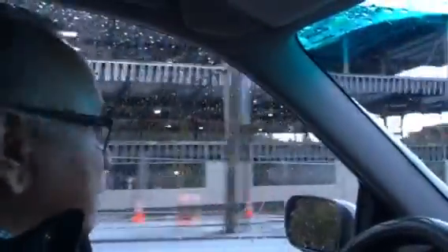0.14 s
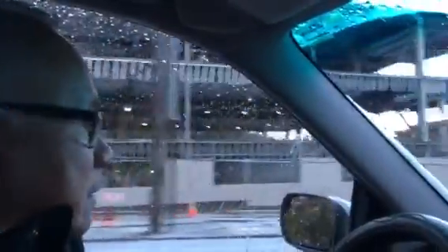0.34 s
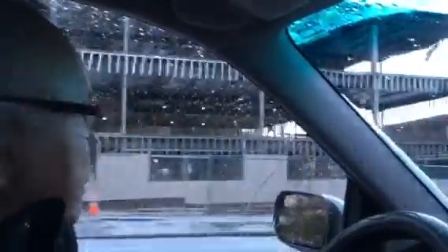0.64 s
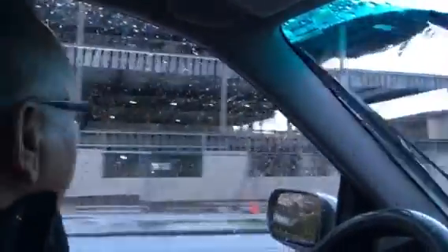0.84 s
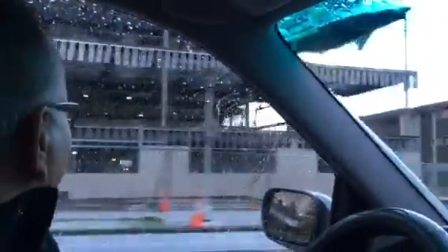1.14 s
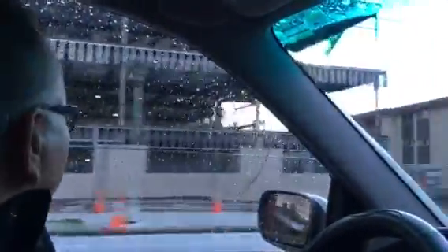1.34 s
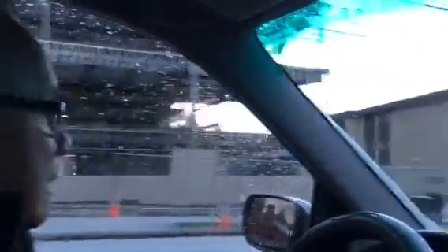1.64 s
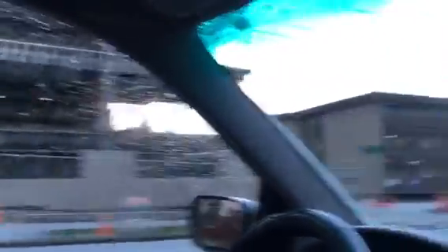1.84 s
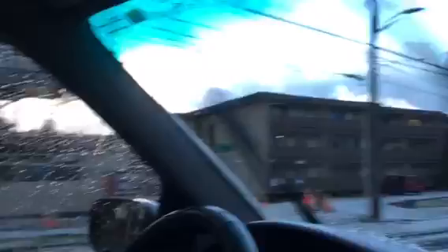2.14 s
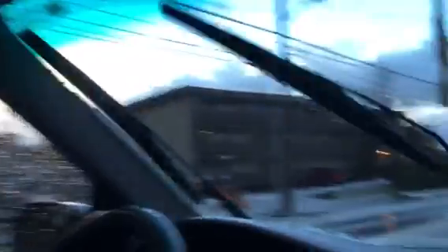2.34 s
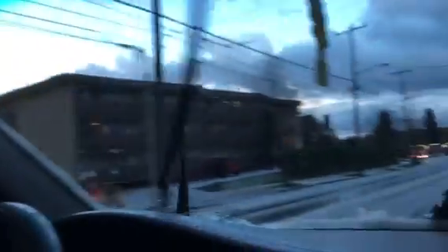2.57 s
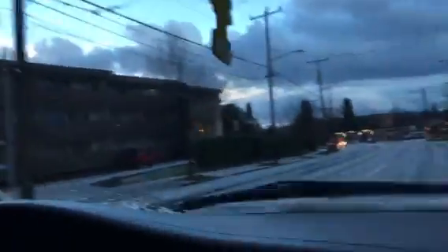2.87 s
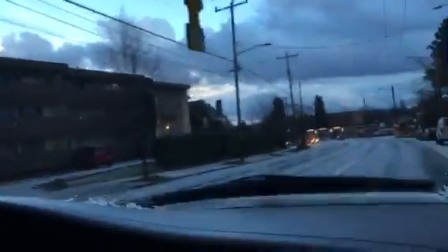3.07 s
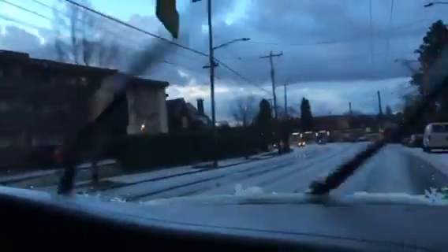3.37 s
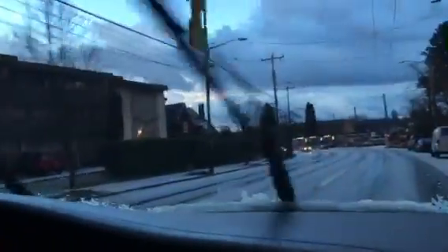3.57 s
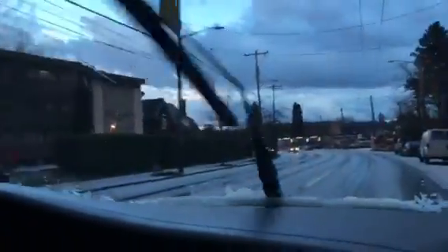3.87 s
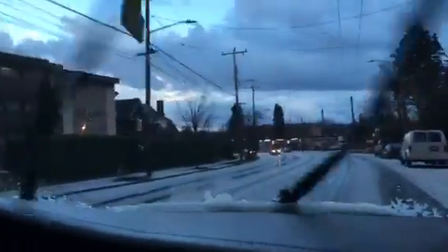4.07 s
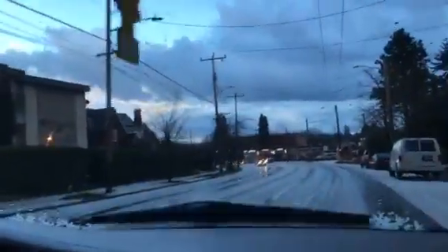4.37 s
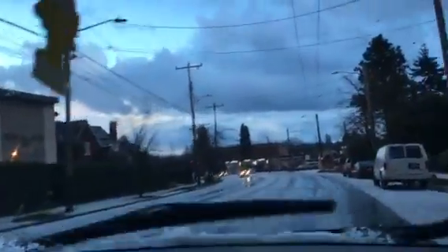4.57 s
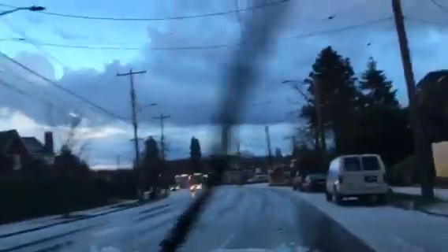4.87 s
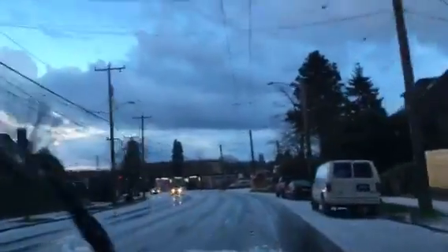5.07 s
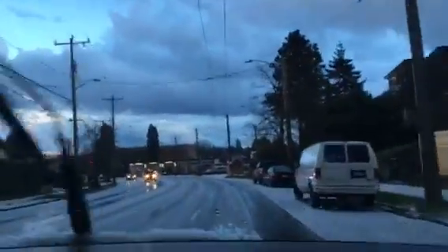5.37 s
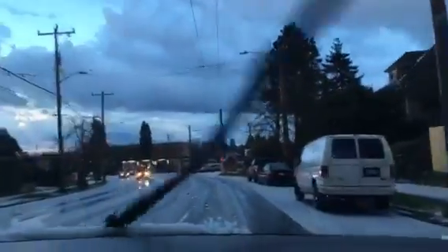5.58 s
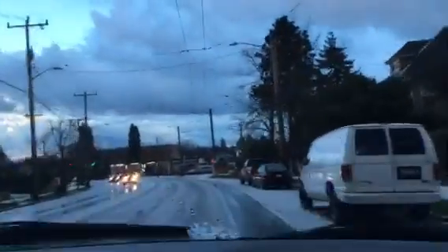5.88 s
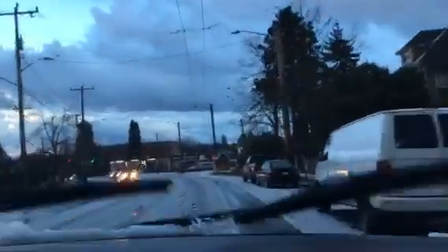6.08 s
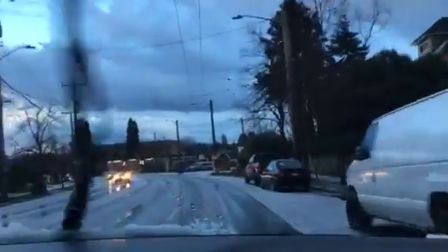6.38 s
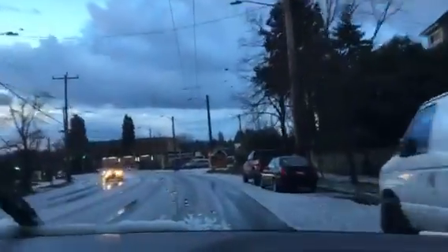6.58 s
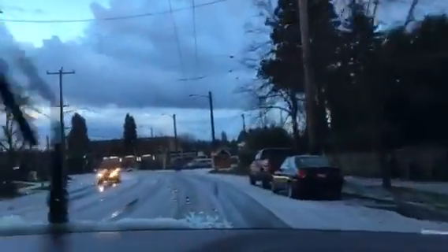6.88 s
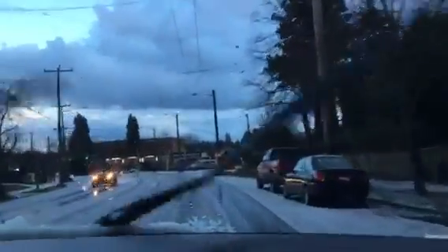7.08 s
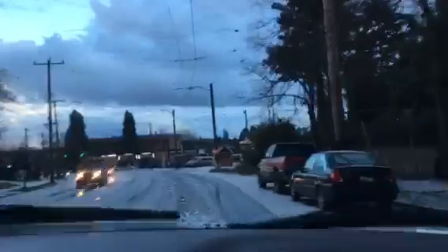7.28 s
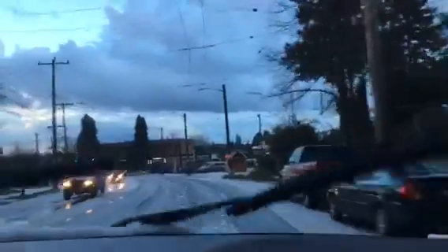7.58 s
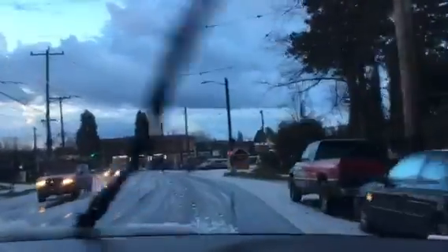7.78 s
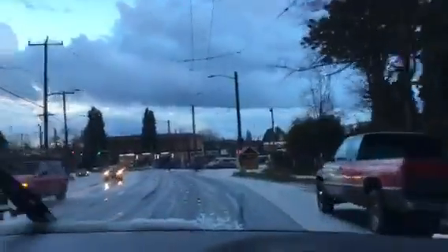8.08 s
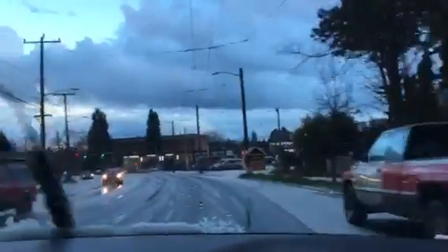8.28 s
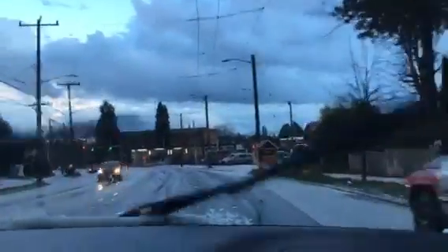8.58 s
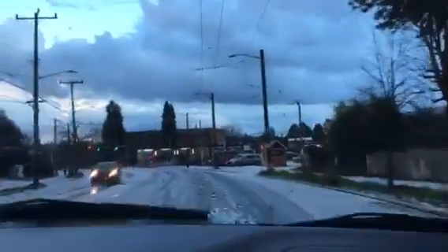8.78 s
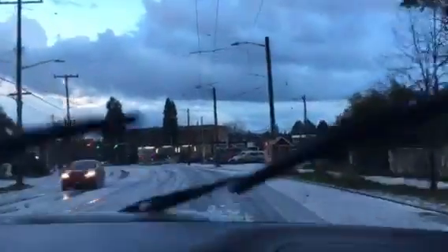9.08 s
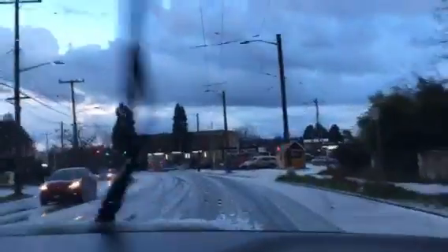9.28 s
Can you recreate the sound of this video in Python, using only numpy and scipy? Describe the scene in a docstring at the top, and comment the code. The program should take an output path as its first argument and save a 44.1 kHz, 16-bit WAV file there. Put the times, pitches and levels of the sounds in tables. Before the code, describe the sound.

Hail cracks and crumbles on a windshield, sparse at first then thickening fast, over a low engine drone and tyre rumble inside a car.

```python
"""Hail on a windshield, heard inside a car on a slushy street, growing most quickly in the third second.
Big stones crack, crumble and knock the pane: dispersed clicks, noise bursts and short decaying modes.
Grains tick between them as smaller impacts; the lined roof patters as noise driven by random clicks.
Engine sines drone, coloured noises sway, boom, rumble and wash, and the tyres hum through a resonator.
Later, decaying noise knocks in the trim, and a wiper squeaks once as a short falling sine."""
import sys
import numpy as np
from scipy import signal
from scipy.fft import rfft, irfft, next_fast_len
from scipy.io import wavfile
from scipy.ndimage import uniform_filter1d

SR = 44100
rng = np.random.default_rng(int(sys.argv[2]) if len(sys.argv) > 2 else 0)


def waveform_to_disk(signal):
    """Save audio, clipped to [-1, 1], as 16-bit WAV at the path in sys.argv[1]."""
    frames = np.transpose(np.atleast_2d(signal))
    scaled = np.clip(frames, -1, 1) * 32767
    samples = np.round(scaled).astype(np.int16)
    wavfile.write(sys.argv[1], SR, samples)


N = 415422
TIME = np.arange(N) / SR
CUTOFF_HZ = 15900  # top of the audible band here
LEAD_S = .002  # room before each crack for the sound that runs ahead of it


def from_db(db):
    """Decibels to gain."""
    return 10 ** (np.asarray(db) / 20)


def rms_one(x):
    """Scale to unit rms."""
    return x / np.sqrt(np.mean(x ** 2) + 1e-20)


def unit_energy(rows):
    """Scale each short sound to an energy of 1."""
    return rows / np.linalg.norm(rows, axis=1, keepdims=True)


def in_time(rows):
    """Each column of a curve at every sample."""
    s, *columns = np.transpose(rows)
    return [np.interp(TIME, s, column) for column in columns]


def coloured(x, points):
    """Minimum-phase filter through the spectrum points; unit power gain, along the last axis."""
    size = next_fast_len(x.shape[-1], real=True)
    hz, db = np.transpose(points)
    octave = np.log2(np.fft.rfftfreq(size, 1 / SR) + 1)
    knots = np.log2(hz)
    # beyond the end points: 12 dB per octave down below, 30 above
    low_skirt_db = 12 * np.maximum(knots[0] - octave, 0)
    high_skirt_db = 30 * np.maximum(octave - knots[-1], 0)
    skirts_db = np.minimum(low_skirt_db + high_skirt_db, 80)
    gain = from_db(np.interp(octave, knots, db) - skirts_db)
    # folding the cepstrum makes the filter causal
    cepstrum = irfft(np.log(rms_one(gain)), size)
    cepstrum[1:size // 2] *= 2
    cepstrum[size // 2 + 1:] = 0
    response = np.exp(rfft(cepstrum))
    return irfft(rfft(x, size) * response, size)[..., :x.shape[-1]]


def noise(points):
    """Steady noise of one colour, rms 1."""
    return rms_one(coloured(rng.standard_normal(N), points))


def evened(x, window_s):
    """Take the slow swells out of a noise."""
    return x / np.sqrt(uniform_filter1d(x ** 2, int(window_s * SR)) + 1e-9)


def placed(times, sounds):
    """Lay short sounds on the time line."""
    out = np.zeros(N + sounds.shape[1])
    starts = np.clip(times * SR, 0, N - 1).astype(int)
    for start, sound in zip(starts, sounds):
        out[start:start + len(sound)] += sound
    return out[:N]


# engine cruising, then pulling harder: time_s, firing_rate_hz, drone_db, octave_db
ENGINE_CURVE = [(0, 48.46, -21.5, -40), (.8, 49.07, -29, -36), (4.25, 49.39, -28.5, -37.5),
                (4.7, 54.37, -23.5, -31.5), (6.4, 55, -24.5, -35), (7.9, 53.44, -25.5, -39),
                (9.42, 53.46, -24.5, -35.5)]


def engine(rough=0.21, wander_rad=0.086, driveline_db=-13.5):
    """Firing rate, octave and a driveline order hum; uneven firing makes level and phase flutter."""
    firing_hz, drone_db, octave_db = in_time(ENGINE_CURVE)
    slow = [(5, 0.5), (14, -10.5), (100, -72)]  # flutter colour: hz, density_db
    phase = 2 * np.pi * np.cumsum(firing_hz) / SR + wander_rad * noise(slow)
    drone = from_db(drone_db) * np.sin(phase)
    octave = from_db(octave_db) * np.sin(2 * phase)
    driveline = from_db(drone_db + driveline_db) * np.sin(1.75 * phase)
    flutter = 1 + rough * noise(slow)
    return np.sqrt(2) * flutter * (drone + octave + driveline)


# road surface getting rougher and smoother under the tread: time_s, rumble_db
ROAD_ROUGHNESS = [(0, -34.5), (1.8, -35.5), (2.6, -33), (3.3, -35.5), (4.5, -34), (5.8, -36), (9.42, -36)]
# dips that make the body heave and the floor boom: time_s, heave_db, boom_db
ROAD_DIPS = [(.25, -31, -42), (5.2, -29, -55), (6.76, -45, -35), (7.24, -26, -26), (7.551, -23, -32),
             (8.15, -31, -29), (8.45, -23.5, -35)]
# relative spectra of body sway, floor boom, tread rumble and slush: freq_hz, density_db
SWAY_COLOUR = [(22, -1.5), (33, 13), (43, 22), (56, -7.5)]
BOOM_COLOUR = [(45, -18.5), (61, 6), (73, 13.5), (83, 5), (95, 7), (104, 1), (117, 7), (138, -3.5),
               (200, -25.5)]
RUMBLE_COLOUR = [(110, -11), (158, 4), (190, -4.5), (215, -4.5), (245, -9), (285, -8.5), (350, -12),
                 (420, -25)]
WASH_COLOUR = [(250, -11), (420, 0.5), (620, 1), (820, -4), (1050, -2.5), (1400, -8.5), (2800, -10.5),
               (5000, -22), (15000, -21)]


def tyres(cruise_hz=51.2, boom_db=-30.5, boom_db_per_hz=0.5, sway_db=-33.0, dip_s=0.087,
          wash_db=-49.0, wash_rise_db=1.5):
    """The road sways the body and booms in the floor; tread rumbles, slush washes in the wheel arches."""
    heave, thud = 0, 0
    for dip_time_s, heave_db, thud_db in ROAD_DIPS:
        swell = np.exp(-((TIME - dip_time_s) / dip_s) ** 2)
        heave = heave + from_db(heave_db) * swell
        thud = thud + from_db(thud_db) * swell
    body = (from_db(sway_db) + heave) * evened(noise(SWAY_COLOUR), 0.2)
    # the floor booms louder as the engine's firing rate rises
    firing_hz = in_time(ENGINE_CURVE)[0]
    boom = from_db(boom_db + boom_db_per_hz * (firing_hz - cruise_hz)) + thud
    floor = boom * evened(noise(BOOM_COLOUR), 0.14)
    tread = from_db(in_time(ROAD_ROUGHNESS)[0]) * noise(RUMBLE_COLOUR)
    along = TIME / TIME[-1] - .5
    slush = from_db(wash_db + wash_rise_db * along) * noise(WASH_COLOUR)
    return body + floor + tread + slush


def tyre_hollow(hz=208, q=6.9, level_db=-39.5, at_s=0.62, width_s=0.88):
    """A rough stretch of road sets the air inside the tyres humming: rumble through one resonance."""
    hum = signal.lfilter(*signal.iirpeak(hz, q, fs=SR), noise(RUMBLE_COLOUR))
    stretch = np.exp(-((TIME - at_s) / width_s) ** 2)
    return from_db(level_db) * stretch * rms_one(hum)


# relative spectrum of the lined roof: freq_hz, density_db
ROOF_COLOUR = [(300, 7), (650, 1), (1100, 8.5), (1800, 7), (2750, 6), (3600, 6), (5000, -2.5),
               (15000, -14.5)]


def roof(strength_db, level_db=-50.0, per_s=260, size_spread_db=6.0, t60=0.041):
    """Dense hail and rain on the roof, blurred by the sheet and dulled by its lining; t60 in s."""
    sizes = np.clip(rng.standard_normal(N), -2, 2)
    # doubled decibels turn amplitude gains into energies
    clicks = (rng.random(N) < per_s / SR) * from_db(2 * size_spread_db * sizes)
    keep = from_db(-2 * 60 / (t60 * SR))
    energy = signal.lfilter([1], [1, -keep], clicks + 1e-18)
    patter = coloured(np.sqrt(energy) * rng.standard_normal(N), ROOF_COLOUR)
    return from_db(level_db + strength_db) * rms_one(patter)


# relative spectra of the bare crack, and of crumbling ice with the cabin tail: freq_hz, density_db
CRACK_COLOUR = [(700, -28), (1800, 3), (3000, 2), (6100, 16), (7700, 10.5), (9400, 15.5), (10400, 13.5),
                (12000, 16), (15500, 16.5)]
GLASS_COLOUR = [(500, -10.5), (1100, -3), (1900, -3.5), (2800, 6.5), (3700, 4), (4900, 1), (5900, 2.5),
                (7700, -1), (9300, 1.5), (10400, -4), (12000, 1), (15500, 0)]


def impacts(s, crack_db, crumble_db, tilt_db, size, spread_s=0.00021, echo_db=-19.0, crumble_s=0.0031,
            shatter_db=5.0, forerun_s=0.0011, tail_db=-0.5, tail_t60=0.055, far_tail_db=4.5, spot_db=2.5):
    """Ice on glass: crack, echo off the dashboard, crumbling burst and short cabin tail; tilt in dB/octave."""
    count = len(s)
    age = np.arange(size) / SR - LEAD_S
    hz = np.fft.rfftfreq(size, 1 / SR)
    place, gap, phase, bulk = rng.random((count, 4)).T[:, :, None]

    # bending waves carry the treble ahead of the bass, the more so from a far spot
    bend = spread_s * place * 2 * (np.sqrt(hz * CUTOFF_HZ) - hz)
    direct = np.exp(-2j * np.pi * (hz * LEAD_S + bend + phase))
    echo_s = 0.0017 + 0.000963 * gap
    echo = from_db(echo_db) * np.exp(-2j * np.pi * hz * echo_s)
    crack = coloured(irfft(direct * (1 + echo)), CRACK_COLOUR)

    # the stone breaks up in uneven bits; a bulky one takes longer
    lumps = np.repeat(rng.standard_normal((count, size // 16)), 16, axis=1)
    rise = np.minimum(age, 0) / forerun_s
    breaking = np.exp(rise - (age / (crumble_s * (.5 + bulk))) ** 4)
    crumble = unit_energy(breaking * from_db(shatter_db * lumps) * rng.standard_normal((count, size)))

    # seats and windows return a share of every hit, more of one that lands far off
    fade = (age > 0) * from_db(-60 * age / tail_t60)
    tail = unit_energy(fade * rng.standard_normal((count, size)))
    hard, soft = from_db(crack_db)[:, None], from_db(crumble_db)[:, None]
    tail_gain = from_db(tail_db + far_tail_db * (place - .5)) * np.hypot(hard, soft)
    hit = hard * crack + coloured(soft * crumble + tail_gain * tail, GLASS_COLOUR)

    # every spot on the pane favours other pitches; the tilt pivots at 7 kHz
    octaves = np.log2(np.maximum(hz, 1500) / 7000)
    ripple = np.sin(2 * np.pi * (octaves * (.5 + gap) + rng.random((count, 1))))
    tone = from_db(tilt_db[:, None] * octaves + spot_db * ripple)
    return placed(s - LEAD_S, irfft(rfft(hit) * tone))


def flurries(delay_s=0.025, lull=.5):
    """Hail comes in flurries: grains crowd in behind each big stone, then thin out; mean 1."""
    falls = np.histogram(np.transpose(BIG_STONES)[0], N, (0, N / SR))[0].astype(float)
    keep = np.exp(-1 / (delay_s * SR))
    # two equal poles: the crowd peaks delay_s after the stone
    crowd = signal.lfilter([1], [1, -2 * keep, keep ** 2], falls)
    share = np.clip(lull, 0, 1)
    return share + (1 - share) * crowd / crowd.mean()


def grains(strength_db, per_s=100, crack_db=-24.0, crumble_db=-26.0, size_spread_db=8.5,
           size_follows=0.42, tilt_db=-1.1, tilt_spread_db=3.0):
    """Small grains tick at random on all the windows and grow with the shower; hard click, wet splat."""
    s = TIME[rng.random(N) < per_s * flurries() / SR]
    size, hardness = 2 * rng.random((len(s), 2)).T - 1
    size_db = size_follows * np.interp(s, TIME, strength_db) + size_spread_db * size
    hard_db = tilt_spread_db * hardness
    grain_crack_db = size_db + crack_db + hard_db
    grain_crumble_db = size_db + crumble_db - hard_db
    return impacts(s, grain_crack_db, grain_crumble_db, tilt_db + hard_db, size=1280)


# stones that stand out on the windshield, energies before the pane's tone:
# time_s, crack_energy_db, crumble_energy_db
BIG_STONES = [(0.1605, -25, -17), (0.2087, -23, -15.5), (0.2467, -10, -12), (0.2893, -18, -28),
              (0.586, -12, -16.5), (0.6691, -10, -15), (0.7547, -17, -14), (0.8076, -16, -9.5),
              (0.8623, -11, -8), (0.9339, -13.5, -13.5), (0.9935, -29, -15.5), (1.0302, -11, -10.5),
              (1.159, -20.0, -17), (1.3851, -27, -17), (1.6077, -17, -15), (1.6163, -12, -10.5),
              (1.6381, -10, -12), (1.6964, -21, -18), (1.7284, -8.5, -8.5), (1.8392, -11.0, -9.5),
              (1.8774, -16, -14), (1.9126, -16, -19), (1.9783, -12.5, -12.5), (2.0912, -7.5, -12),
              (2.1217, -5.5, -14), (2.2429, -14, -23), (2.3164, -16, -19.5), (2.3607, -12, -11.5),
              (2.3764, -20.0, -18.5), (2.4615, -17, -13), (2.486, -22, -12), (2.584, -5.5, -8),
              (2.596, -12, -8), (2.6837, -10, -10), (2.7274, -21, -13.5), (2.7943, -14.5, -22),
              (2.8263, -8.5, -13), (2.8797, -11, -19), (2.942, -11, -9), (2.9466, -5.5, -9),
              (2.9958, -13, -19), (3.0055, -7, -6.5), (3.0447, -4.5, -11), (3.1061, -16.5, -18),
              (3.1798, -11, -12), (3.1912, -4, -13), (3.2135, -13, -10.5), (3.2188, -8.5, -9),
              (3.3046, -17.0, -13), (3.3576, -14.5, -27), (3.3842, -11, -21), (3.5697, -5.5, -13.5),
              (3.6202, -16, -12.5), (3.6546, -13, -16), (3.7327, -6, -6), (3.7398, -9, -7.5),
              (3.782, -4.5, -8), (3.786, -9, -7.5), (3.809, -15, -15), (3.9216, -14.0, -17.5),
              (3.928, -15.0, -13.5), (3.9687, -9.0, -11.5), (4.1209, -11, -17), (4.1636, -6.5, -16),
              (4.2052, -12.5, -20), (4.2354, -14, -10), (4.307, -19, -14), (4.3241, -4.5, -9),
              (4.3503, -11, -13), (4.444, -9, -12.0), (4.475, -16, -4.5), (4.4975, -13, -11.5),
              (4.5026, -12, -21), (4.5417, -12, -13), (4.5728, -9, -6), (4.6488, -15.5, -28),
              (4.6996, -9, -14), (4.7865, -12, -10.5), (4.7933, -10.0, -8.0), (4.808, -5, -6),
              (4.8198, -9, -7), (4.8643, -11, -9.5), (4.8812, -21, -11.5), (4.9734, -14, -10.5),
              (4.9948, -8.5, -9.5), (5.048, -13, -21), (5.11, -7, -6.5), (5.1826, -14, -10.0),
              (5.2085, -5.5, -7.5), (5.2669, -12, -9.5), (5.2899, -21, -14), (5.3232, -11, -9.5),
              (5.352, -19, -24), (5.43, -12, -15), (5.4374, -15, -12.5), (5.471, -22, -15),
              (5.5089, -12, -5), (5.6029, -8.5, -8), (5.696, -13, -11), (5.7045, -10.0, -12),
              (5.7616, -8, -6.5), (5.7743, -12, -15.0), (5.7968, -3.5, -14), (5.8341, -16, -25),
              (5.8672, -12, -16), (5.8718, -14, -11), (6, -11, -8.5), (6.0765, -9, -7.5),
              (6.0858, -11.5, -6.5), (6.121, -13, -13.5), (6.1598, -5, -6), (6.2029, -14, -13),
              (6.2323, -11.5, -25), (6.3068, -10.5, -10.0), (6.3505, -13, -9.5), (6.392, -6, -10),
              (6.396, -3, -7), (6.4789, -13.5, -17), (6.5238, -6.5, -14), (6.5531, -14, -9.5),
              (6.5896, -12.5, -13), (6.6589, -11, -13.5), (6.7274, -8.5, -8.5), (6.7835, -10, -10.0),
              (6.8136, -15, -11.5), (6.8442, -4, -14), (6.876, -8, -16), (6.9422, -16.0, -12),
              (6.9508, -3.5, -8.0), (6.998, -14, -11), (7.045, -10, -8.5), (7.0657, -16, -12.5),
              (7.1025, -6.0, -17), (7.1543, -9, -6), (7.3802, -13, -17), (7.4144, -12, -11.5),
              (7.4393, -9.0, -11), (7.4652, -10, -9.5), (7.4977, -4, -16), (7.6375, -3.5, -7.5),
              (7.69, -4, -3.5), (7.7573, -17, -10), (7.8366, -6, -8.5), (7.8993, -9.5, -10.5),
              (7.9332, -8, -10.5), (7.9614, -15.5, -12), (8.1892, -4, -3.5), (8.3179, -23, -10),
              (8.3682, -0.5, -6.5), (8.437, -10, -10), (8.45, -6, -10), (8.4729, -12.5, -12),
              (8.5854, -7, -14), (8.6152, -7.5, -10), (8.6562, -8, -10), (8.69, -6, -15),
              (8.8484, -1, -8.5), (8.8958, -7.5, -6), (9.0008, -5.5, -12.5), (9.015, -27, -12.5),
              (9.0549, -11, -10), (9.0634, -11, -8.5), (9.1312, -15, -10.5), (9.1623, -11.0, -8.5),
              (9.1825, -13, -6), (9.2085, -4, -4), (9.255, -3, -10), (9.3547, -6, -9), (9.3846, -11, -5.5)]


def hailstones(tilt_per_db=0.2286, tilt_spread_db=0.72):
    """Stones on the windshield: hard ones crack brightly, slushy ones crumble with a duller sound."""
    s, crack_db, crumble_db = np.transpose(BIG_STONES)
    tilt_db = tilt_per_db * (crack_db - crumble_db) + tilt_spread_db * rng.standard_normal(len(s))
    return impacts(s, crack_db, crumble_db, tilt_db, size=1792)


def panel_knocks(level_db=-35, spread_db=4.5, low_hz=550, high_hz=2200, cycles=22, size=1536):
    """Each big stone knocks four low modes of the pane, other ones at every spot; heavier hits are louder."""
    s, crack_db, crumble_db = np.transpose(BIG_STONES)
    pitch, weight = rng.random((len(s), 2, 4, 1)).swapaxes(0, 1)
    hz = low_hz * (high_hz / low_hz) ** pitch
    t = np.arange(size) / SR
    # each mode dies by 60 dB over the given number of cycles
    mode_db = spread_db * (2 * weight - 5.5) - 60 * hz * t / cycles
    modes = np.sin(2 * np.pi * hz * t) * from_db(mode_db)
    gain = from_db((crack_db + crumble_db) / 2 + level_db)[:, None]
    return placed(s, gain * modes.sum(axis=1))


# knocks of the body and trim: time_s, start_level_db
TRIM_KNOCKS = [(2.372, -36), (2.441, -39), (7.55, -40.5), (7.752, -41), (8.071, -45), (8.281, -37.5),
               (8.41, -41), (8.88, -41)]
# their relative spectrum: freq_hz, density_db
KNOCK_COLOUR = [(200, -1), (600, 5), (1100, -5.5), (2500, -12), (6000, -30)]


def knocks(t60=0.16):
    """Ruts jolt the suspension and trim: sudden noise that dies by 60 dB in t60 seconds."""
    envelope = 0
    for knock_s, db in TRIM_KNOCKS:
        decay = from_db(db - 60 * np.abs(TIME - knock_s) / t60)
        envelope = envelope + decay * (TIME > knock_s)
    return envelope * evened(noise(KNOCK_COLOUR), t60 / 10)


def wiper_squeak(at_s=8.192, level_db=-42, hz=1120, width_s=0.019, sag_hz_per_s=5500):
    """Wiper rubber squeaks once on the glass: a brief sine swells and fades, falling in pitch."""
    age = TIME - at_s
    phase = 2 * np.pi * (hz - .5 * sag_hz_per_s * age) * age
    return from_db(level_db) * np.exp(-(age / width_s) ** 2) * np.sin(phase)


# shower swelling slowly, then quickly, then slowly again: time_s, strength_db
SHOWER_CURVE = [(0, -19), (2.3, -14), (2.9, -7), (9.42, -1.5)]


def scene():
    """Hail outside, car underneath, heard from the front seat."""
    strength_db, = in_time(SHOWER_CURVE)
    car = engine() + tyres() + tyre_hollow()
    hail = roof(strength_db) + grains(strength_db) + hailstones() + panel_knocks()
    return (car + hail + knocks() + wiper_squeak())[None]


def record(dry):
    """A steep elliptic low-pass cuts the top of the treble."""
    low_pass = signal.ellip(10, .2, 80, CUTOFF_HZ, fs=SR, output="sos")
    return signal.sosfilt(low_pass, dry)


dry = scene()
out = record(dry)
waveform_to_disk(out)
```